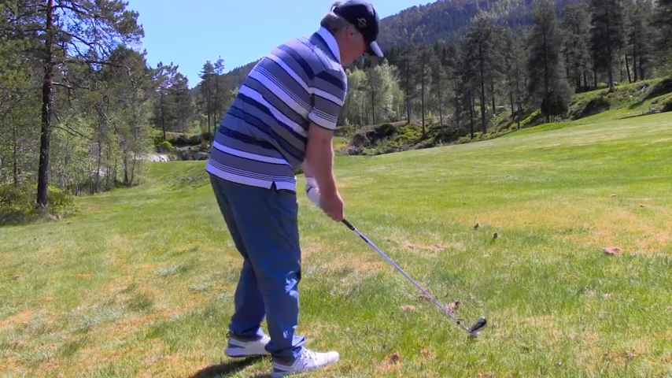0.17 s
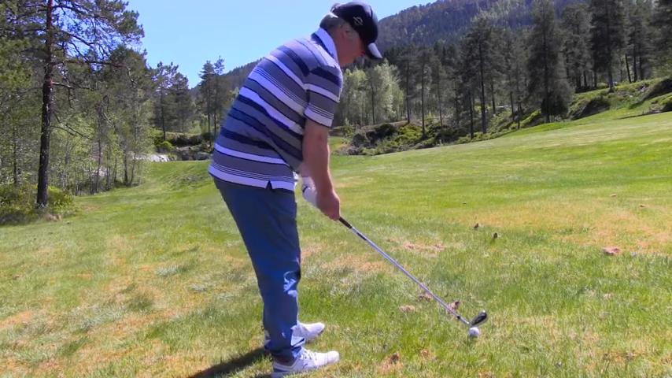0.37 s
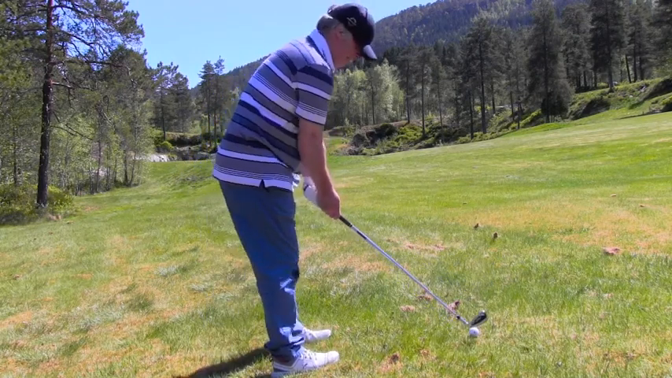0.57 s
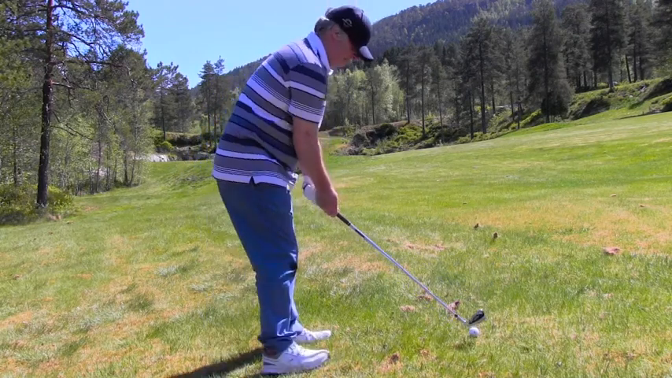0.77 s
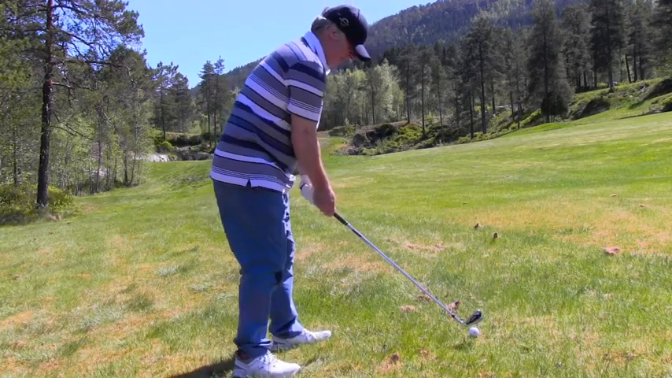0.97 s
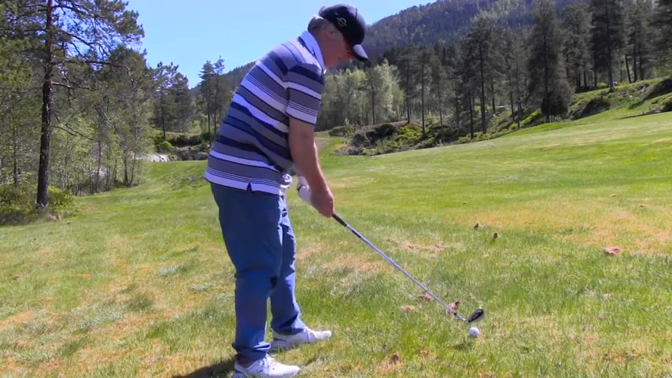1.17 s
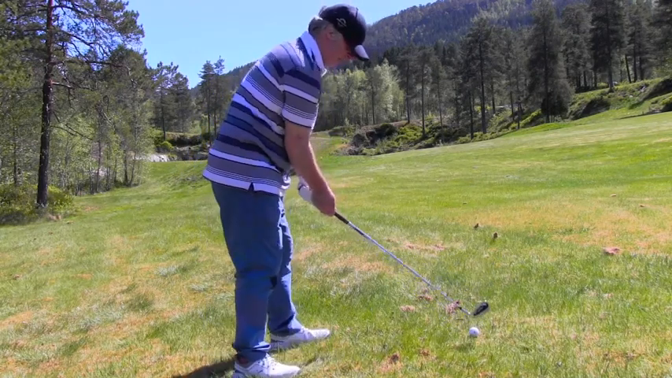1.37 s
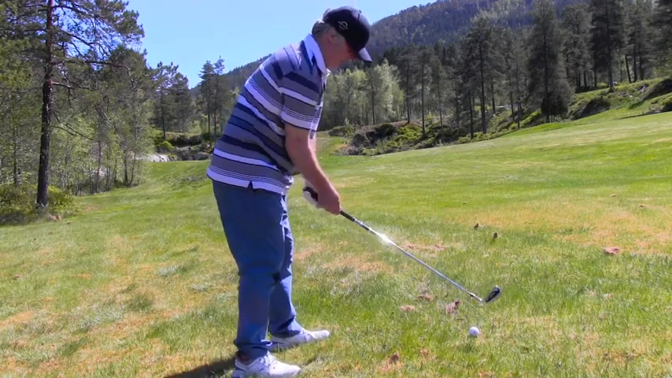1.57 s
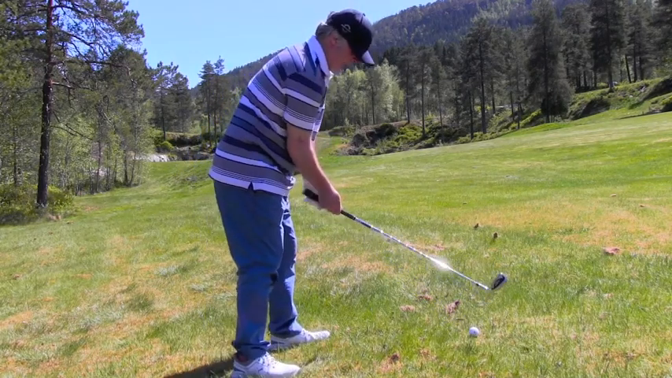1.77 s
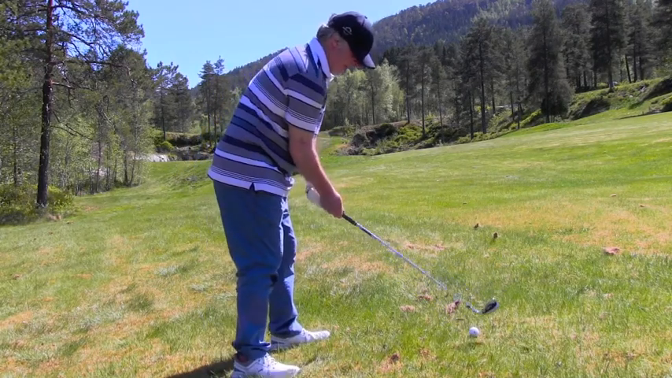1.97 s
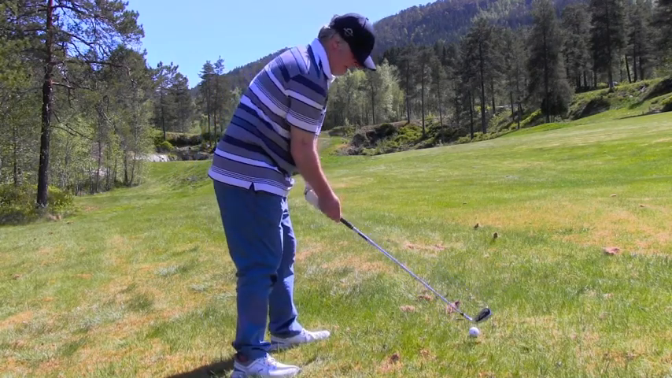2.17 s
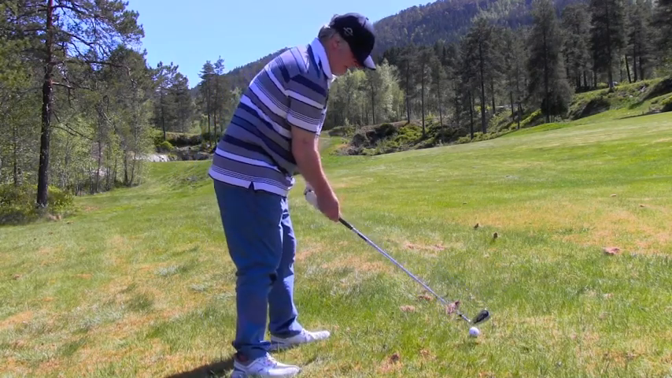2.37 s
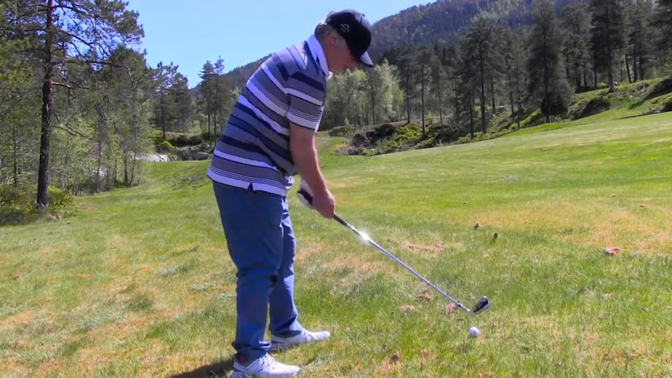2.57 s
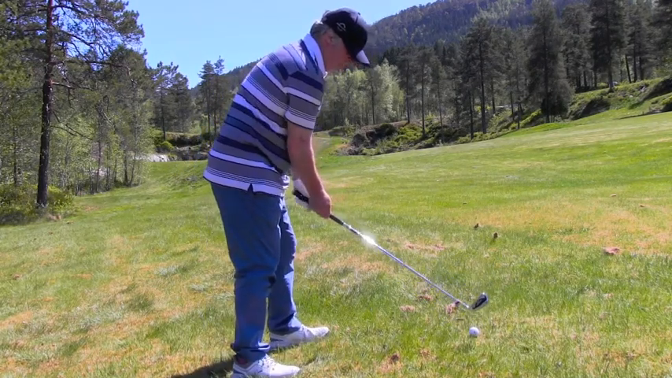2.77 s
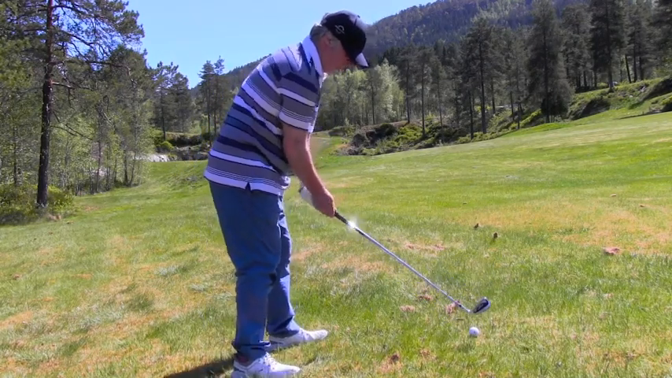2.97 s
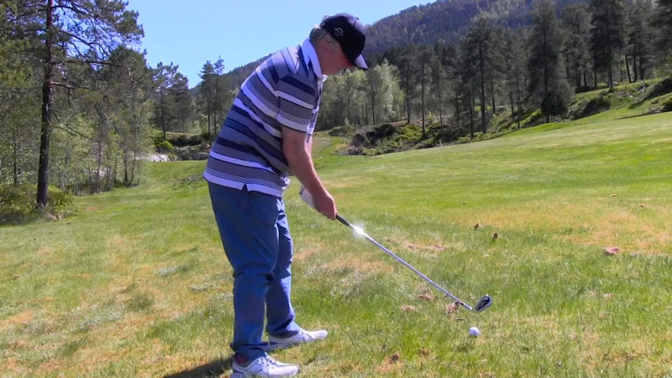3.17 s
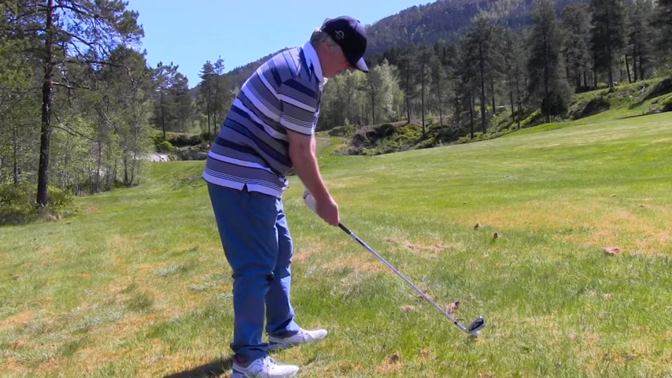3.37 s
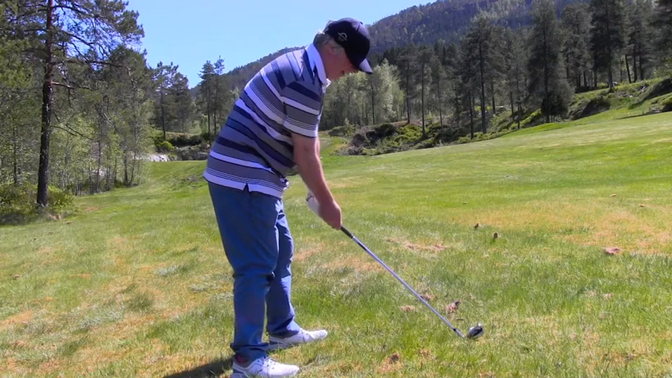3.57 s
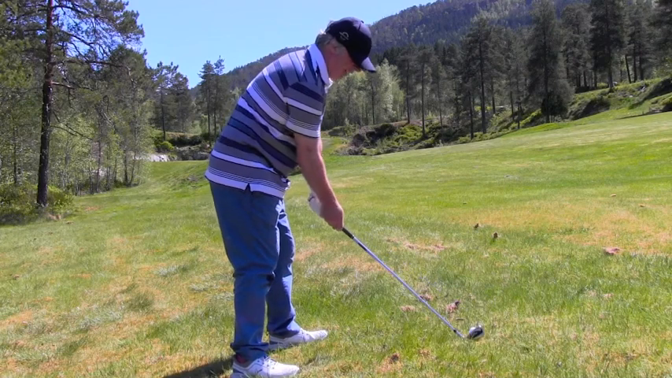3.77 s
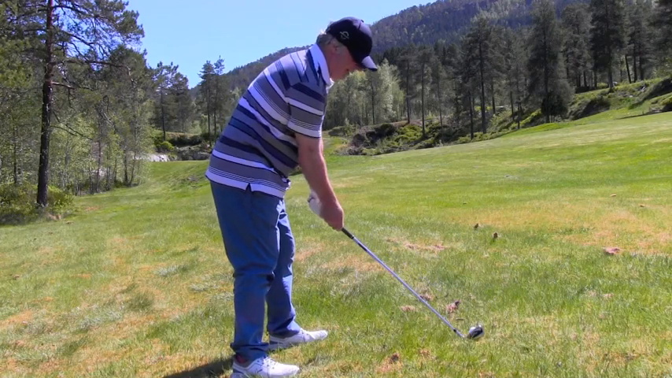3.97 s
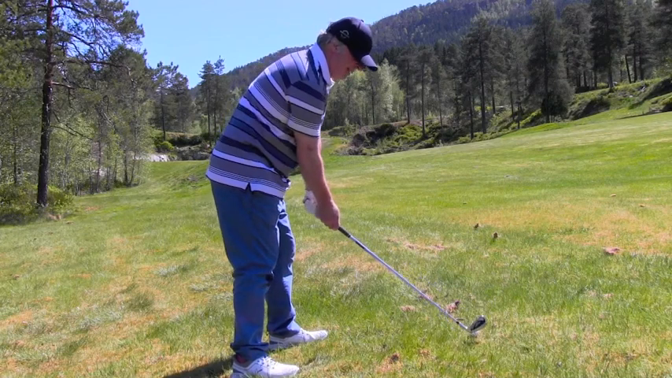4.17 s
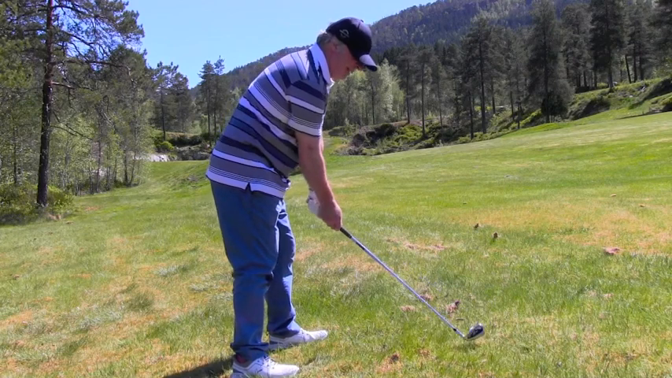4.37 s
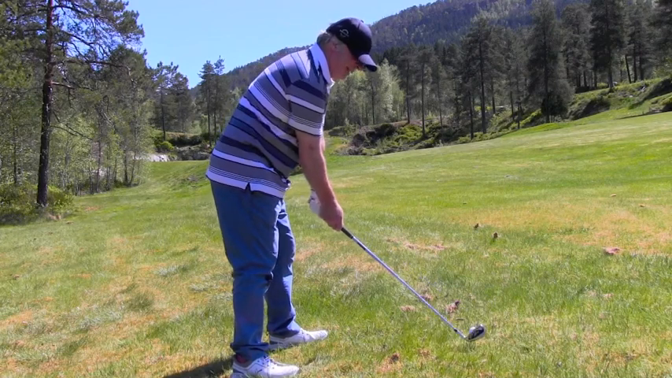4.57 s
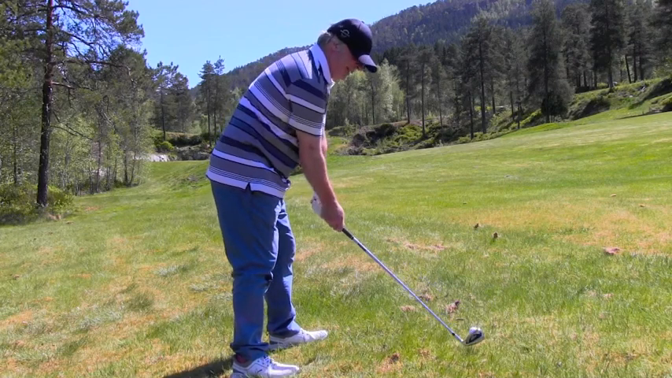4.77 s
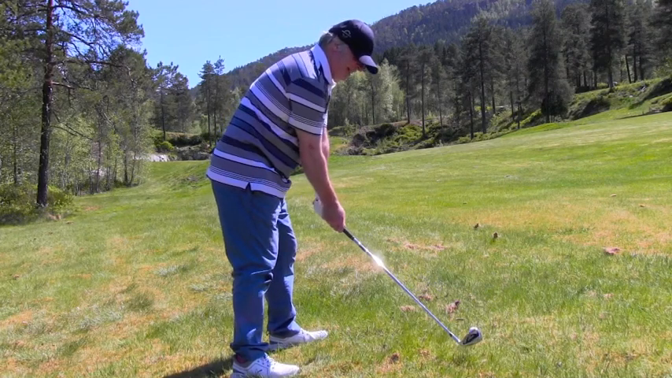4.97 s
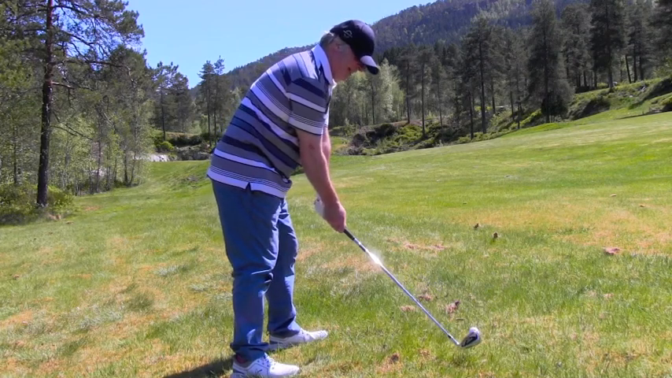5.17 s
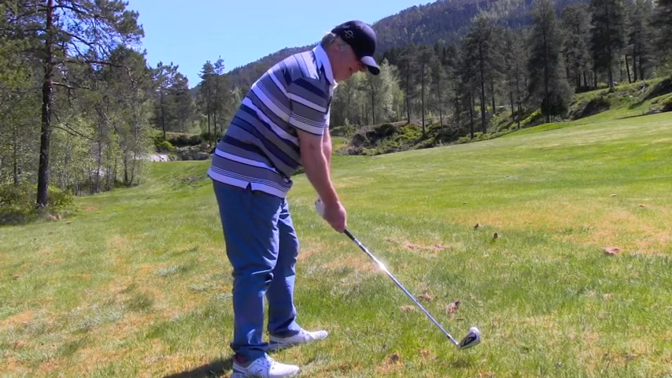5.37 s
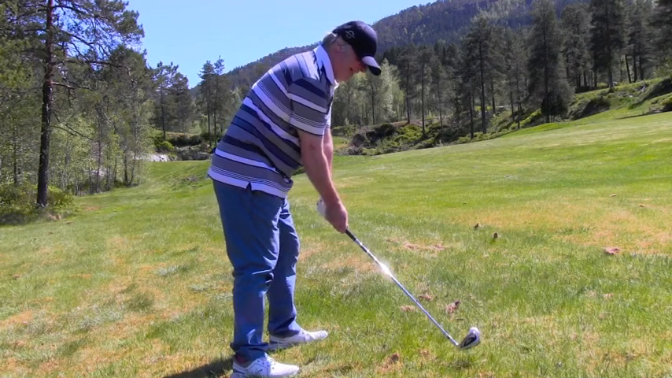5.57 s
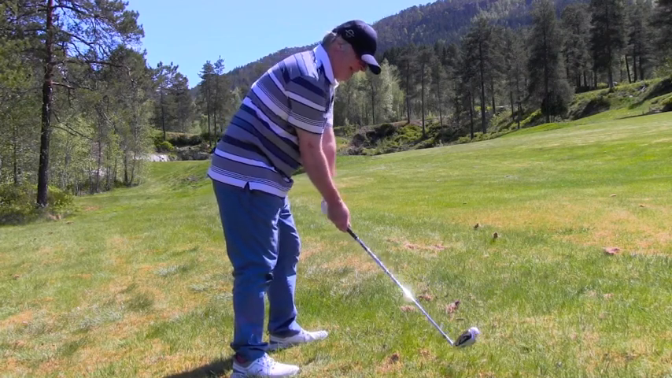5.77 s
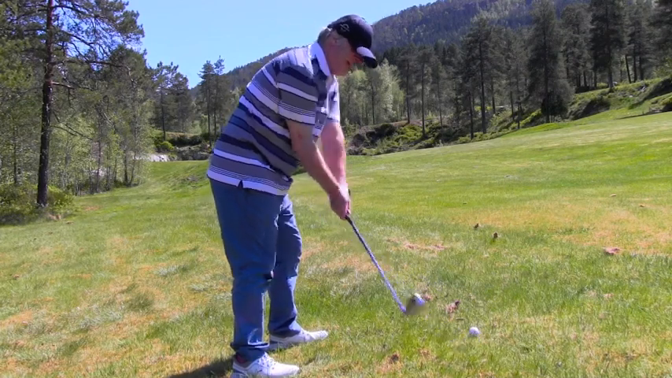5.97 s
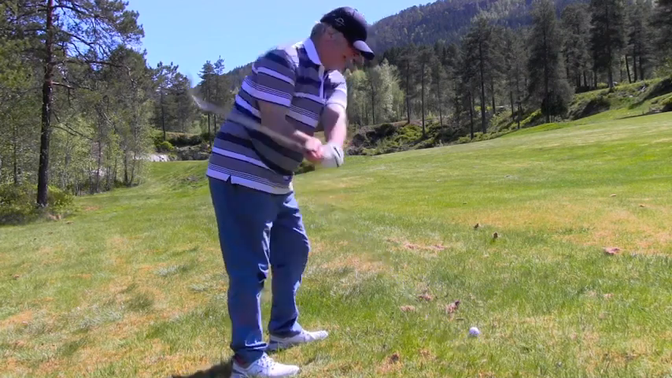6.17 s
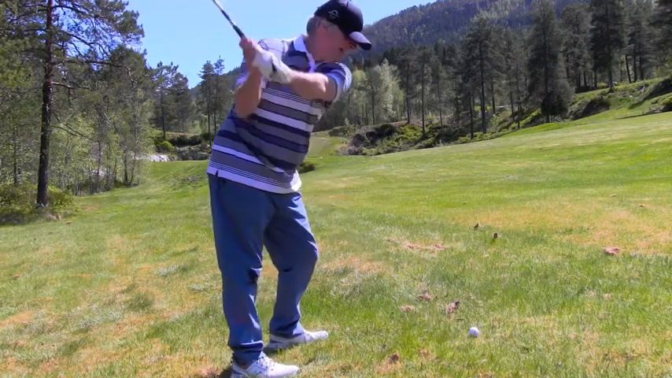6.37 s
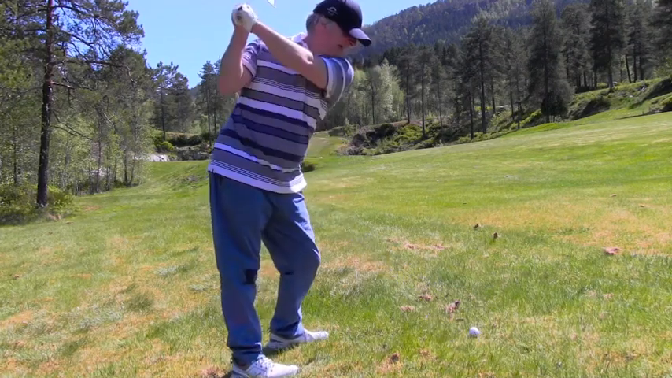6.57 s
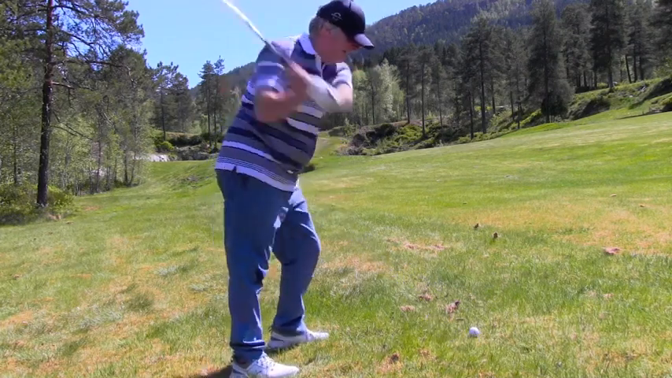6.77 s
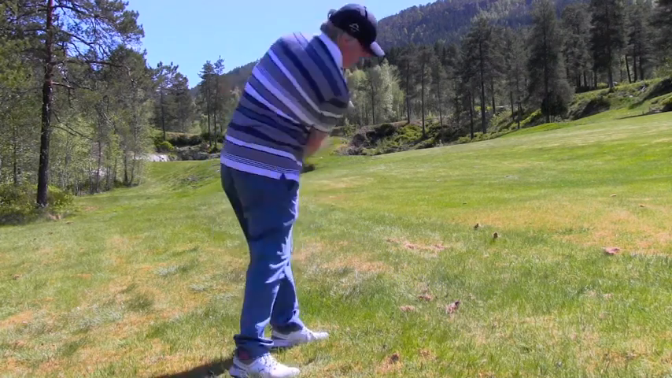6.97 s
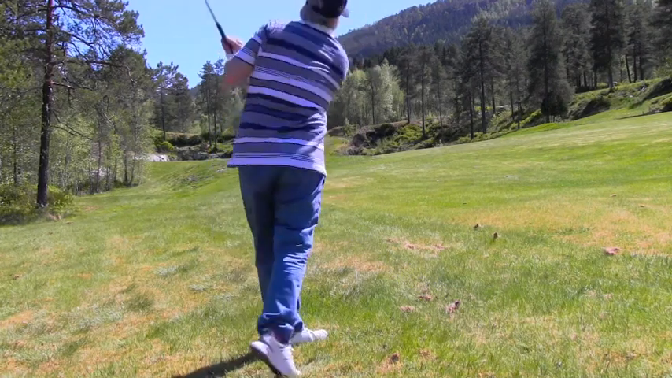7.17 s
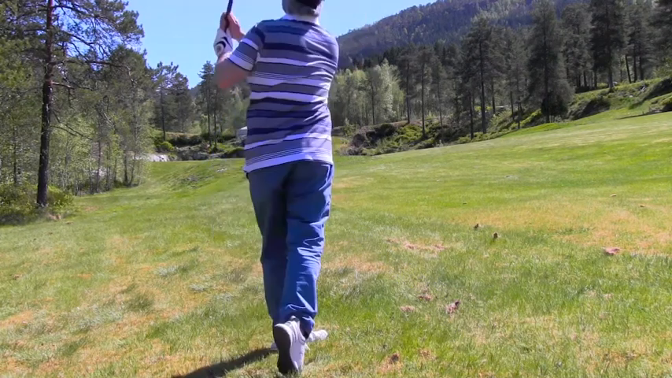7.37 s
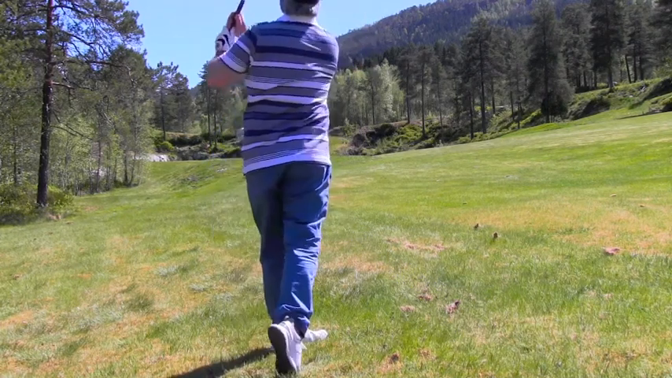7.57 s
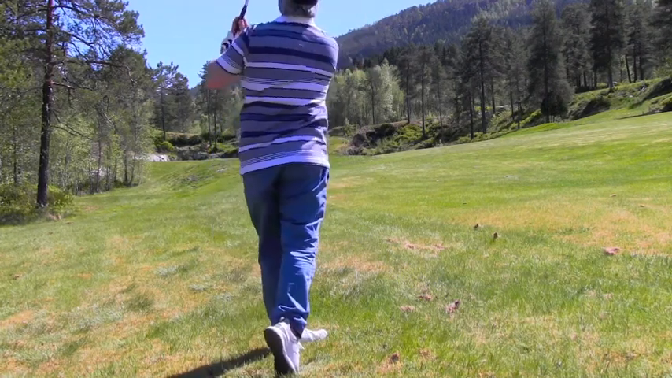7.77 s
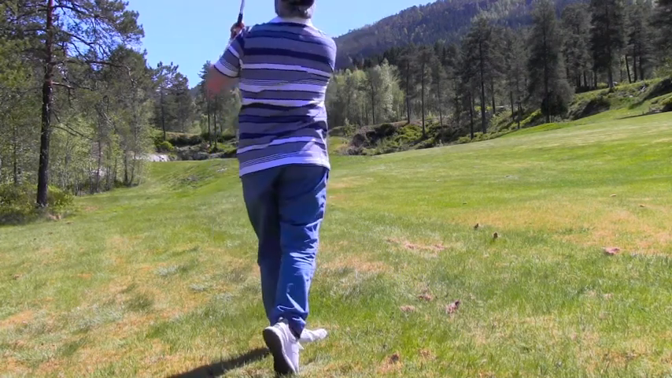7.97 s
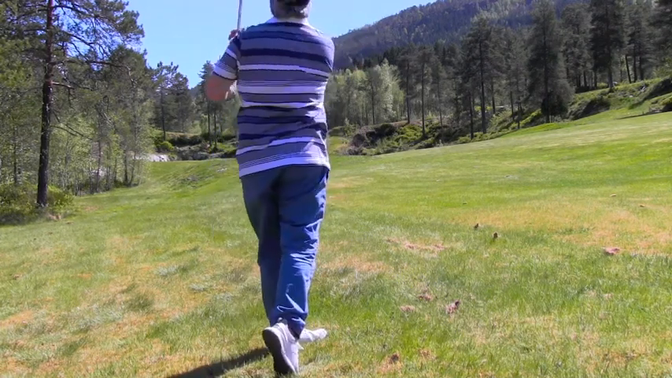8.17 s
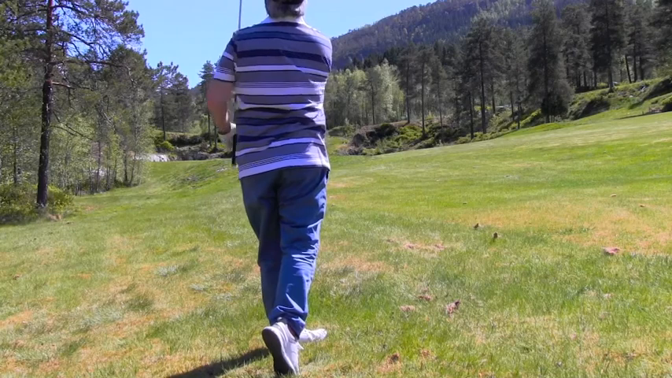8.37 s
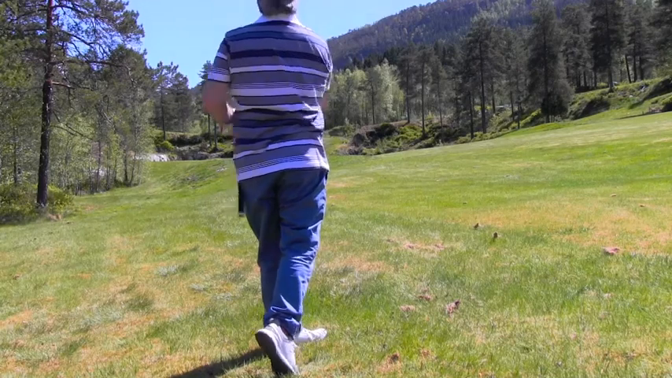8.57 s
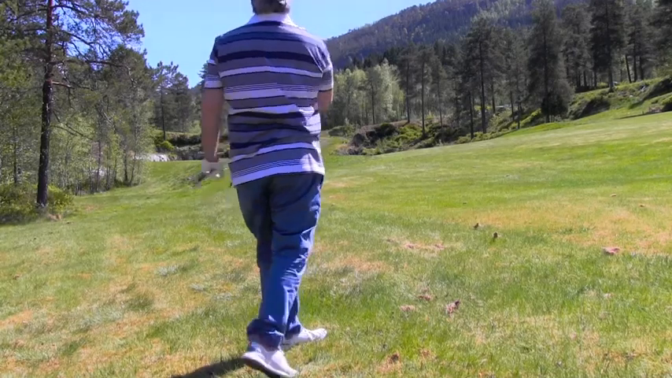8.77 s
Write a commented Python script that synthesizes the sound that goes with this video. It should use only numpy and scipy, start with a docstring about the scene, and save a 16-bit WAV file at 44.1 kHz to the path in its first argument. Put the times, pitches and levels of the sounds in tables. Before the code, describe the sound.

A golf club swishes and strikes a ball with one sharp click, over light wind, a distant engine hum and a small singing bird.

```python
"""Iron shot on a hillside golf course

A club swishes, clicks hard on the ball and slaps the turf; bits of grass fall. The click overloads the
microphones. Air rushes in the trees, swelling around the stroke, and two distant engines hum and beat.
To the left a small bird whistles a falling song, with fainter birds, a thin whine and two far clacks."""
import sys
import numpy as np
from scipy import signal
from scipy.fft import rfft, irfft
from scipy.io import wavfile
from scipy.ndimage import uniform_filter1d

SR = 44100
rng = np.random.default_rng(int(sys.argv[2]) if len(sys.argv) > 2 else 0)


def wav_out(sig):
    """Save sig, one row per channel (or a flat mono array), as 16-bit PCM at SR to the path in sys.argv[1]."""
    wavfile.write(sys.argv[1], SR, np.round(np.clip(np.atleast_2d(sig).T, -1, 1) * 32767).astype(np.int16))


N = 389378
TIME = np.arange(N) / SR
HZ = np.fft.rfftfreq(N, 1 / SR)
BURST_HZ = np.arange(SR // 2 + 1) + 1.  # frequency axis of a one-second burst, offset to avoid zero


def gain_of(db):
    """Amplitude ratio: a factor of ten for every 20 dB."""
    return 10 ** (np.asarray(db) / 20)


def unit_rms(x):
    """Normalisation to a mean power of one."""
    return x / np.sqrt(np.mean(x ** 2) + 1e-20)


def curve_at(points, hz):
    """Interpolation on a logarithmic frequency axis."""
    point_hz, value = np.transpose(points)
    return np.interp(np.log(hz + 1), np.log(point_hz + 1), value)


def add(mix, start_s, sound):
    """Superposition: a sound sums into the mix from start_s on."""
    part = mix[..., round(start_s * SR):][..., :sound.shape[-1]]
    part += sound[..., :part.shape[-1]]


def panned(left_db):
    """Direction by level difference: two gains, the left greater by left_db."""
    return gain_of(np.array([np.atleast_1d(left_db), -np.atleast_1d(left_db)]) / 2)


def drift(rate_hz):
    """Random fluctuation: low-passed noise of unit rms."""
    return unit_rms(irfft(rfft(rng.standard_normal(N)) / (1 + (HZ / rate_hz) ** 4), N))


def noise_pair(bins, coherence):
    """Partial coherence: the right noise spectrum mixes the left one with an independent one."""
    a, b, c, d = rng.standard_normal((bins, 4)).T
    left, independent = a + 1j * b, c + 1j * d
    shared = np.clip(coherence, 0, 1)
    return np.array([left, shared * left + np.sqrt(1 - shared ** 2) * independent])


def background(spectrum, leftness):
    """Steady coloured noise, placed mostly to the left by differences of level and phase."""
    coherence = [(35, .4), (80, 1.04), (170, 0.43), (280, 0.7), (750, 0.93), (1100, 0.8), (1600, 0.36),
                 (2200, 0.2), (2600, 0.8), (3500, -0.24), (4800, 0.7), (6500, 0.84), (15000, 1.1)]  # likeness of the channels: frequency_hz, coherence (clipped to 0-1)
    balance = [(200, -0.7), (450, 3), (750, 4), (1000, 6), (2000, 8), (3300, 5), (4300, 1), (6000, -0.5)]  # level difference at leftness 1: frequency_hz, left_db
    phase_lead = [(60, -0.14), (200, 0.4), (450, 0.53), (850, 1.31), (1600, 1.12), (2400, -0.18),
                  (3000, 0.59), (3900, -1.2), (5000, -0.75), (6500, 0)]  # phase difference: frequency_hz, left_lead_rad
    pair = noise_pair(len(HZ), curve_at(coherence, HZ)) * panned(leftness * curve_at(balance, HZ))
    pair[0] *= np.exp(1j * curve_at(phase_lead, HZ))
    return unit_rms(irfft(pair * gain_of(curve_at(spectrum, HZ)), N))


def swells_db(swells):
    """Wind strength rises and falls as a sum of Gaussian bumps in level."""
    return sum(db * np.exp(-((TIME - peak_s) / half_width_s) ** 2) for peak_s, half_width_s, db in swells)


def air():
    """Turbulence makes broadband noise: an outdoor floor, and a rush in the trees that follows gusts."""
    floor_spectrum = [(20, -16), (45, -2), (110, 5), (225, -5.5), (410, .5), (480, -0.5), (650, 2),
                      (1050, -2.5), (1500, -7), (1750, -13), (2600, -16.5), (3700, -20), (4900, -23.5),
                      (8000, -30.2), (13500, -34.5), (15800, -36)]  # outdoor air: frequency_hz, relative_density_db
    rush_spectrum = [(150, 0.5), (350, 0.5), (480, 3.8), (950, 2), (1200, 0), (1500, 3), (1800, 0),
                     (2300, -3.5), (2800, -7), (3200, -9.5), (4000, -14.5), (6000, -24), (10000, -31.5),
                     (16000, -36)]  # wind in the trees: frequency_hz, relative_density_db
    gusts = [(0, 1.24, 8.3), (6.55, 1.71, 11.5), (8.3, 0.85, 3)]  # swells out of the lull: peak_s, half_width_s, boost_db
    floor_db, lull_db = -43, -53.5
    floor = background(floor_spectrum, leftness=0.76) * gain_of(floor_db + 0.36 * drift(rate_hz=11))
    rush_db = lull_db + swells_db(gusts) + 0.64 * drift(rate_hz=15)
    return floor + gain_of(rush_db) * background(rush_spectrum, leftness=1.6)


def buffeting(centre_hz, octaves, calm_db):
    """Wind pressure fluctuates at each microphone separately, so the rumble is incoherent."""
    puffs = [(.1, 0.17, 21), (1.2, 0.65, 11), (6.2, 0.9, 7)]  # swells out of the calm: peak_s, half_width_s, boost_db
    band = np.exp(-(np.log2((HZ + 1) / centre_hz) / octaves) ** 2 / 2)
    rumble = unit_rms(irfft(noise_pair(len(HZ), coherence=0) * band, N))
    return rumble * gain_of(calm_db + swells_db(puffs))


def engine(firing_hz, firing_db, third_db, octave_db, sixth_db):
    """Shaft harmonics of an engine that fires twice a turn; each wavers on its way through the air."""
    shaft_rad = np.pi * firing_hz * TIME
    orders = [(2, firing_db), (3, third_db), (4, octave_db), (6, sixth_db)]
    tones = (gain_of(db + 0.66 * drift(rate_hz=3.4)) * np.cos(order * shaft_rad) for order, db in orders)
    return np.sqrt(2) * sum(tones)


def engine_hum():
    """Beating: two far engines at slightly different steady speeds throb at the difference frequency."""
    fading = [(0, -46, -62), (0.9, -42, -45.5), (2.2, -48.1, -59), (3.6, -55.1, -50), (5.2, -45.0, -50.5),
              (5.8, -47.5, -60), (6.9, -49, -45), (7.9, -53, -58.3), (8.83, -49, -44)]  # the first fades in and out over the hill: time_s, firing_db, octave_db
    time_s, *levels = np.transpose(fading)
    firing_db, octave_db = (np.interp(TIME, time_s, level) for level in levels)
    first = engine(firing_hz=68.0, firing_db=firing_db, third_db=-57.5, octave_db=octave_db, sixth_db=-63.5)
    second = engine(firing_hz=70.73, firing_db=-58.5, third_db=-69, octave_db=-47.5, sixth_db=-70)
    return first + second


def whine(pitch_hz, level_db, fade_db_per_s):
    """Random modulation spreads a tone into a narrow band: a thin, unsteady, fading whine on the left."""
    phase = 2 * np.pi * pitch_hz * TIME
    tone = unit_rms(drift(rate_hz=30) * np.cos(phase) + drift(rate_hz=27) * np.sin(phase))
    return gain_of(level_db - fade_db_per_s * TIME) * tone * panned(7.4)


def forest_echoes(sound, t60_s):
    """Scattering from trees: sparse echoes of random sign build up, then decay exponentially."""
    t = TIME[:SR]
    taps = rng.standard_normal((2, SR)) * (rng.random((2, SR)) < .05)
    response = taps * (1 - np.exp(-t / 0.033)) * gain_of(-60 * t / t60_s)
    return signal.fftconvolve(sound[None], response / np.linalg.norm(response[0]), axes=1)[:, :N]


def far_birds():
    """Reverberation without direct sound: short random glides from deep in the forest."""
    # bouts of at most 60 chirps: first_s, last_s, pitch_hz, chirps_per_s, level_db
    bouts = [(0, .6, 2850, 70, -55.5), (0, 1.1, 5000, 50, -63.5), (5, 5.9, 2400, 70, -51.5),
             (5.6, 7.1, 3000, 40, -53.5), (3, 3.2, 9700, 40, -66)]
    chirps, t = np.zeros(N), np.arange(0, .05, 1 / SR)
    for first_s, last_s, pitch_hz, chirps_per_s, level_db in bouts:
        count = round(chirps_per_s * (last_s - first_s))
        for when, detune, glide in rng.uniform(-1, 1, size=(60, 3))[:count]:
            cycles = np.cumsum(pitch_hz * (1 + .14 * detune + 3.48 * glide * t)) / SR
            start_s = np.interp(when, [-1, 1], [first_s, last_s])
            add(chirps, start_s, gain_of(level_db) * np.hanning(len(t)) * np.sin(2 * np.pi * cycles))
    return forest_echoes(chirps, t60_s=0.32) * panned(5.6)


def birdsong(echo_db):
    """Whistles are pure tones modulated in frequency and amplitude; these come from the left."""
    # contours of the syllables, by name: share_of_length, pitch_ratio, relative_db
    syllables = { "slur": [(0, 1.05, -7), (.45, 1, 0.5), (1, .88, -6)], "drop": [(0, 1.1, -6), (.3, 1, 0.5),
                 (1, .75, -8)], "arch": [(0, .95, -12), (.4, .97, -3), (.62, 1.01, -1), (1, .81, -11)],
                 "rise": [(0, .92, -2), (.3, .88, -6), (.75, 1.05, -1), (1, 1.24, -8)],
                 "hook": [(0, 1.03, -11), (.35, .82, -9), (.54, .98, -0.5), (.8, 1.02, -2), (1, 1.33, -10)],
                 "scoop": [(0, 1.55, 1), (.08, 1.6, 7), (.23, 1.06, -4), (.42, 1, -9), (.75, 1.16, -1.5),
                 (1, 1.36, -2)], "flick": [(0, .63, 2), (.27, 1.05, -6), (.6, 1, 0), (1, .95, -4)]}
    # stray calls and a song that tumbles into a flourish: start_s, length_s, pitch_hz, level_db, syllable
    notes = [ (.77, .08, 4650, -60, "drop"), (1.785, .085, 4750, -58, "slur"),
             (1.985, .1, 4680, -59, "slur"), (2.865, .045, 6150, -56, "drop"),
             (2.985, .05, 6200, -55, "drop"), (3.085, 0.082, 5950, -51.5, "arch"),
             (3.211, .097, 4400, -47, "hook"), (3.365, .094, 4360, -46, "hook"),
             (3.533, 0.076, 4290, -46, "arch"), (3.67, 0.081, 4260, -40.5, "arch"),
             (3.808, .085, 4250, -41, "arch"), (3.953, .13, 3710, -43.5, "rise"),
             (4.083, 0.028, 3000, -47, "arch"), (4.134, 0.15, 3660, -42.5, "arch"),
             (4.215, 0.033, 2600, -51, "arch"), (4.343, 0.084, 2400, -48.5, "scoop"),
             (4.418, 0.041, 5090, -46, "flick"), (4.434, .018, 3700, -41.5, "arch"),
             (4.452, 0.033, 3100, -43.5, "drop"), (4.528, 0.091, 2380, -47, "scoop"),
             (4.585, .035, 3980, -46.5, "drop"), (4.608, 0.049, 5150, -45.5, "flick"),
             (4.726, .14, 2430, -47, "scoop"), (4.76, .045, 4950, -54, "arch"),
             (4.956, .15, 3120, -46, "drop"), (5.113, .04, 2750, -46.5, "arch"),
             (5.219, .05, 3100, -46.5, "arch"), (5.262, .08, 2230, -49.5, "slur"),
             (5.965, .057, 4200, -54, "flick"), (6.211, .03, 3400, -45, "drop"),
             (6.336, .03, 3950, -46, "drop"), (6.47, .035, 3800, -48, "drop")]
    balance = [(3600, 8.7), (4200, 6.6), (5100, 2)]  # level difference: frequency_hz, left_db
    phase_lead = [(2400, 1), (2900, 1.5), (3600, 3.1), (4200, 4.35), (6000, 4.9)]  # phase difference: frequency_hz, left_lead_rad
    song = np.zeros(N)
    waver = 1 + 0.0083 * drift(rate_hz=140)
    flutter = gain_of(2.5 * drift(rate_hz=67))
    for start_s, length_s, pitch_hz, level_db, syllable in notes:
        t = np.arange(0, length_s, 1 / SR)
        span = round(start_s * SR) + np.arange(len(t))
        share, ratio, shape_db = np.transpose(syllables[syllable])
        glide_hz = pitch_hz * uniform_filter1d(np.interp(t / length_s, share, ratio), size=len(t) // 12)
        contour_db = level_db + np.interp(t / length_s, share, shape_db)
        envelope = gain_of(contour_db) * signal.windows.tukey(len(t), .15)
        cycles = np.cumsum(glide_hz * waver[span]) / SR
        add(song, start_s, envelope * flutter[span] * np.sin(2 * np.pi * cycles))
    direct = rfft(song) * panned(curve_at(balance, HZ))
    direct[1] *= np.exp(-1j * curve_at(phase_lead, HZ))
    return irfft(direct, N) + gain_of(echo_db) * forest_echoes(song, t60_s=0.5)


def burst(rise_s, t60_s, level_db, spectrum):
    """A noise transient: coloured noise rises linearly, then decays exponentially."""
    t = TIME[:SR]
    noise = unit_rms(irfft(noise_pair(len(BURST_HZ), coherence=0.9) * spectrum, SR))
    return noise * np.minimum(t / rise_s, 1) * gain_of(level_db - 60 * np.maximum(t - rise_s, 0) / t60_s)


def clacks():
    """Resonances colour two dull knocks far to the left, blurred into noise by the trees."""
    knocks = [(5.533, .018, 0.13, -39.5), (6.338, .02, 0.24, -43.5)]  # envelopes of the knocks: peak_s, rise_s, t60_s, level_db
    resonances = [(1540, 220, 2), (2210, 540, 0), (3270, 410, -10), (4850, 700, -19)]  # the struck body: centre_hz, bandwidth_hz, relative_db
    body = sum(gain_of(db) / (1 + (2 * (BURST_HZ - hz) / width) ** 2) for hz, width, db in resonances)
    out = np.zeros((2, N))
    for peak_s, rise_s, t60_s, level_db in knocks:
        add(out, peak_s - rise_s, burst(rise_s, t60_s, level_db, body) * panned(11))
    return out


def band_bursts(events):
    """Band-limited transients: each is pink noise under a Gaussian curve in log frequency."""
    out = np.zeros((2, N))
    for peak_s, rise_s, t60_s, level_db, centre_hz, width_octaves, left_db in events:
        band = np.exp(-(np.log2(BURST_HZ / centre_hz) / width_octaves) ** 2 / 2) / np.sqrt(BURST_HZ)
        add(out, peak_s - rise_s, burst(rise_s, t60_s, level_db, band) * panned(left_db))
    return out


def clothes_rustle():
    """Friction of clothes and shoes makes faint hisses in the backswing and as the golfer relaxes."""
    # rustles: peak_s, rise_s, t60_s, level_db, centre_hz, width_octaves, left_db
    rustles = [(6.33, .02, .4, -57, 5200, .4, 1), (8.361, 0.004, .04, -50.5, 7000, .7, -1),
               (8.38, .4, 1.7, -64, 5000, .35, 0), (8.71, 0.027, .25, -61, 7000, .9, 0)]
    return band_bursts(rustles)


def club_stroke():
    """Turbulence around the moving club, then its impact on the turf, radiate bursts of noise."""
    # head swish, shaft hiss, ground contact, soil thud, sole digging in, grass tearing, divot snapping,
    # soil spray, follow-through, falling grass:
    # peak_s, rise_s, t60_s, level_db, centre_hz, width_octaves, left_db
    stages = [ (6.985, .05, 0.19, -32, 774, 1.3, -1.5), (7.003, 0.067, .09, -41.5, 3200, 1.05, -1.5),
              (7.014, .03, .05, -33, 510, .25, -4), (7.015, .006, .06, -29, 185, 0.29, -1),
              (7.0175, 0.00303, 0.036, -21.5, 650, 1.5, -3), (7.015, .0015, 0.047, -29.5, 6000, 2, -3),
              (7.0245, .0005, .012, -27, 13000, 1.2, -8), (7.025, .004, 0.039, -35, 3300, 0.87, -3),
              (7.061, 0.027, 0.25, -49, 6300, 0.79, 2), (7.19, .11, 1.15, -52.5, 4800, 1.05, -1)]
    return band_bursts(stages)


def ball_strike(start_s, gain_db, contact_hz, echo_db):
    """Impact excites heavily damped modes of club head and ball: a click, doubled by close echoes."""
    modes = [(215, -20, 0.028), (451.0, -33, 0.071), (704, -30, 0.045), (1040, 0, 0.0098), (1400, 1, 0.017),
             (1790, 3, 0.0029), (2300, -3, 0.0059), (3299.0, -2.5, 0.0034), (3781.0, -13, 0.01),
             (4615.0, -9, 0.0035), (6171.0, -31, 0.018), (7635.0, -32, 0.0096)]  # club head and ball: frequency_hz, relative_db, t60_s
    reflections = [(.000724, -5), (.001157, -17)]  # early echoes of inverted polarity: delay_s, relative_db
    t, click = TIME[:SR // 4], np.zeros(N)
    ring = sum(gain_of(db - 60 * t / t60_s) * np.sin(2 * np.pi * hz * t) for hz, db, t60_s in modes)
    # the ball squashes, which rounds off the attack
    ring = gain_of(gain_db) * signal.lfilter(*signal.butter(2, contact_hz, fs=SR), ring)
    add(click, start_s, ring)
    for delay_s, db in reflections:
        add(click, start_s + delay_s, -gain_of(db) * ring)
    # the ball lies a little to the right, so the left microphone hears it a sample later
    direct = np.array([np.roll(click, 1), click]) * panned(-3.2)
    return direct + gain_of(echo_db) * forest_echoes(click, t60_s=0.97)


def scene():
    """Superposition: the pressures of all the sources add at two microphones."""
    birds = birdsong(echo_db=-11.5) + far_birds()
    golfer = club_stroke() + clothes_rustle()
    click = ball_strike(start_s=7.01295, gain_db=-0.6, contact_hz=7000, echo_db=-28)
    wind = air() + buffeting(centre_hz=64, octaves=.38, calm_db=-63)
    drones = engine_hum() + whine(pitch_hz=3280, level_db=-70, fade_db_per_s=1.2)
    return wind + drones + birds + clacks() + golfer + click


def record(dry):
    """Saturation: the microphones overload softly on the click; a low-pass then limits the band."""
    cutoff_hz = 15600
    low_pass = signal.firwin(511, cutoff_hz, window=("kaiser", 9), fs=SR)
    return signal.oaconvolve(np.tanh(dry), low_pass[None], "same")


dry = scene()
out = record(dry)
wav_out(out)
```